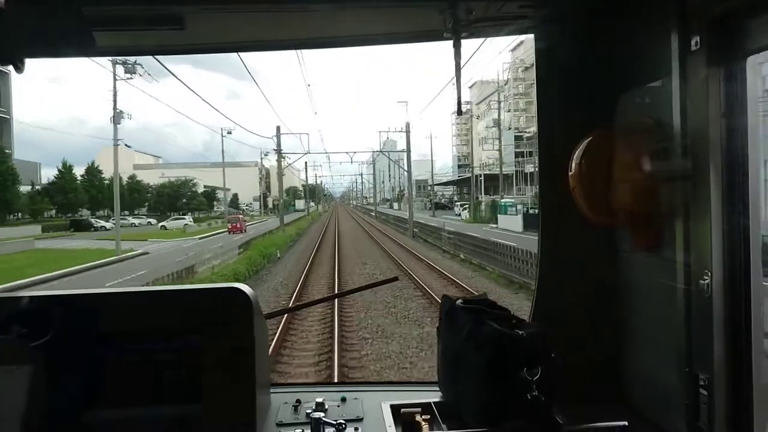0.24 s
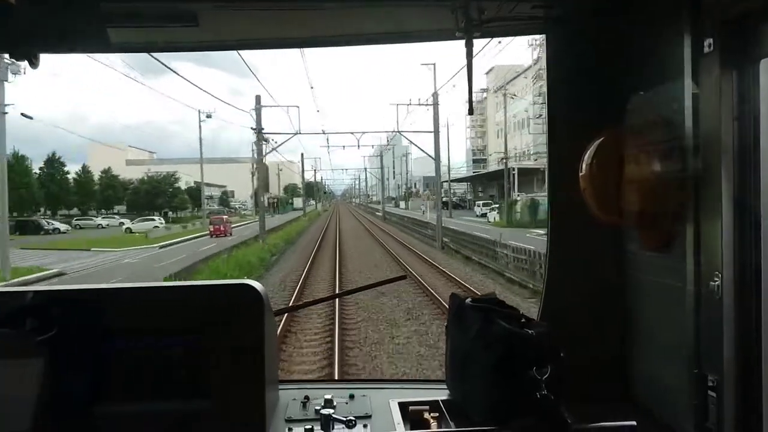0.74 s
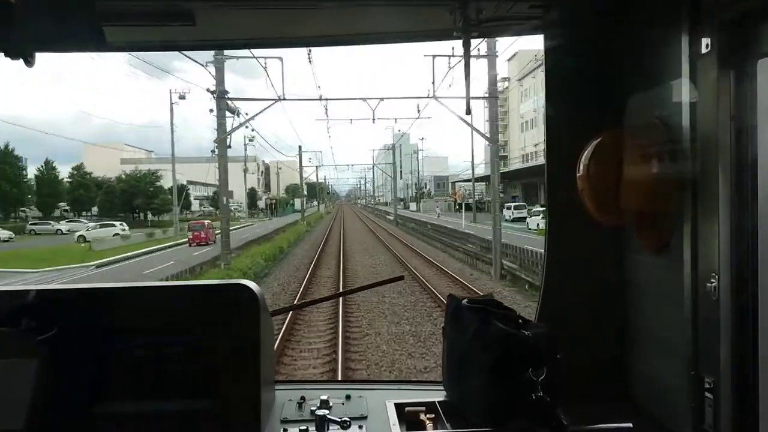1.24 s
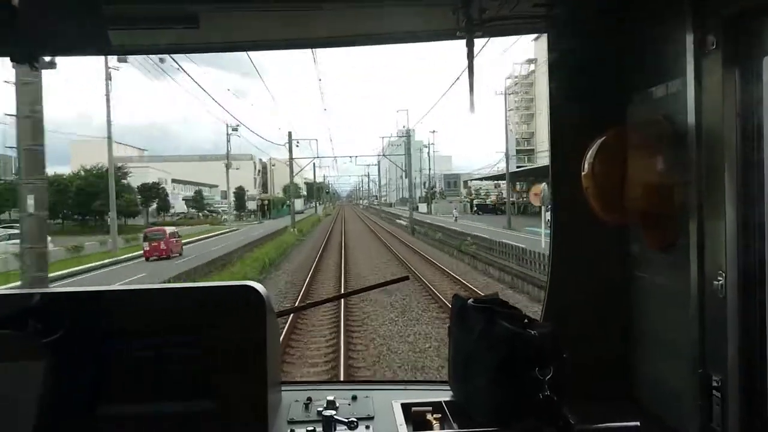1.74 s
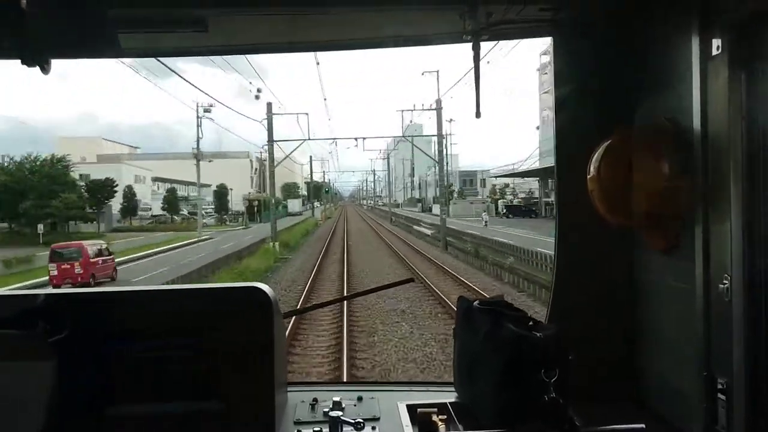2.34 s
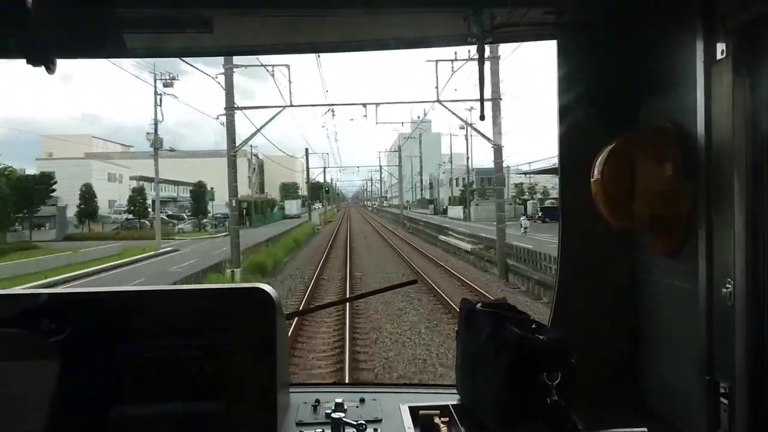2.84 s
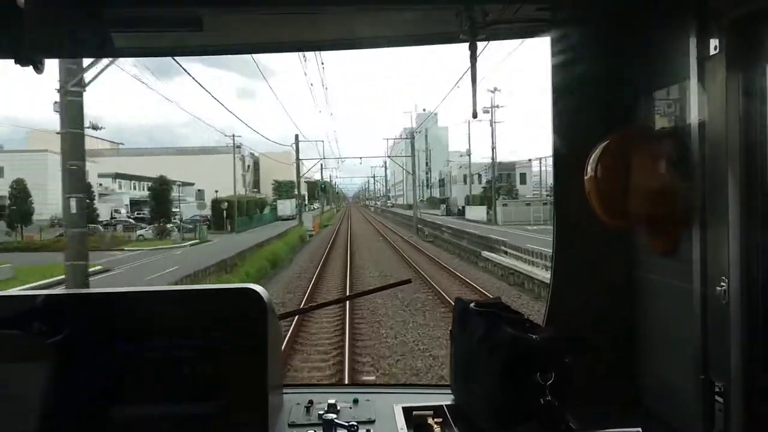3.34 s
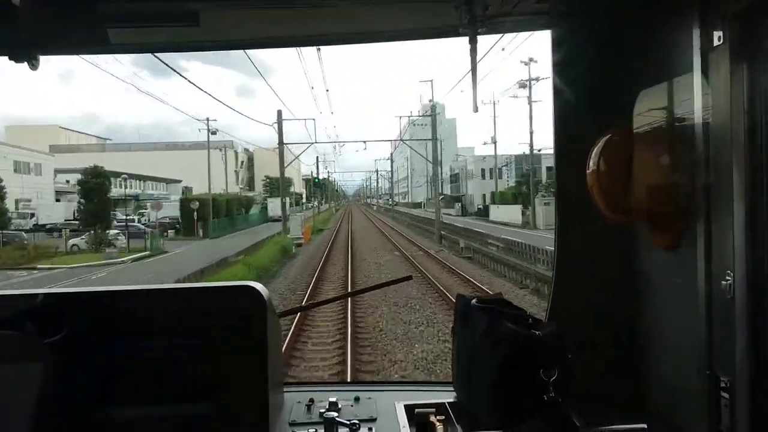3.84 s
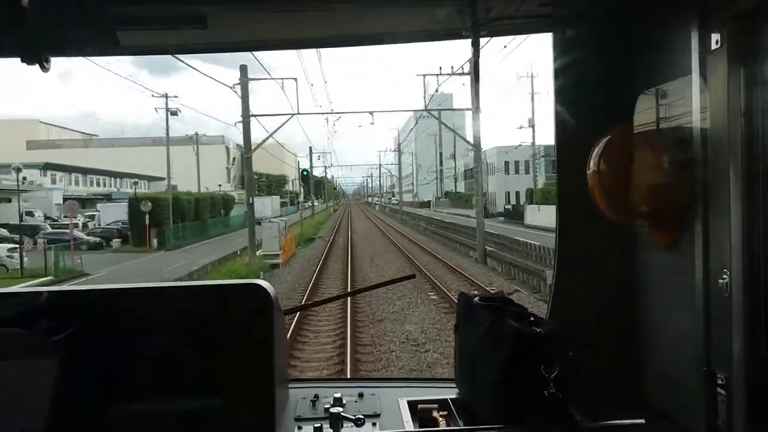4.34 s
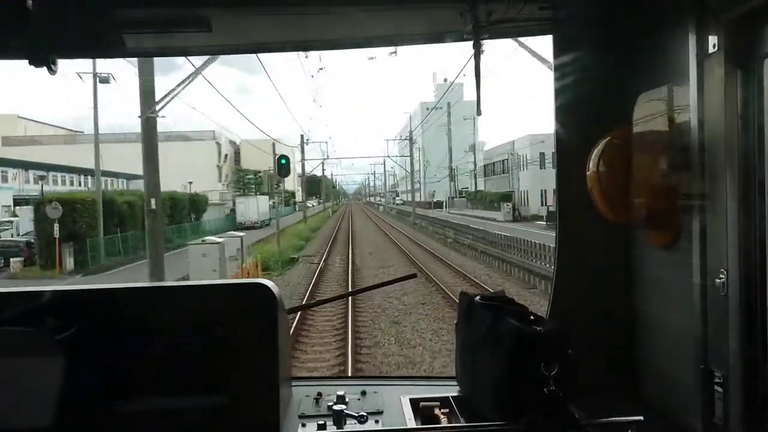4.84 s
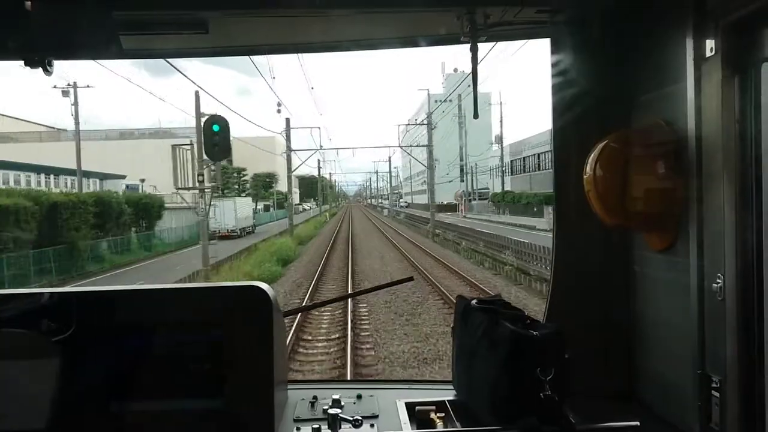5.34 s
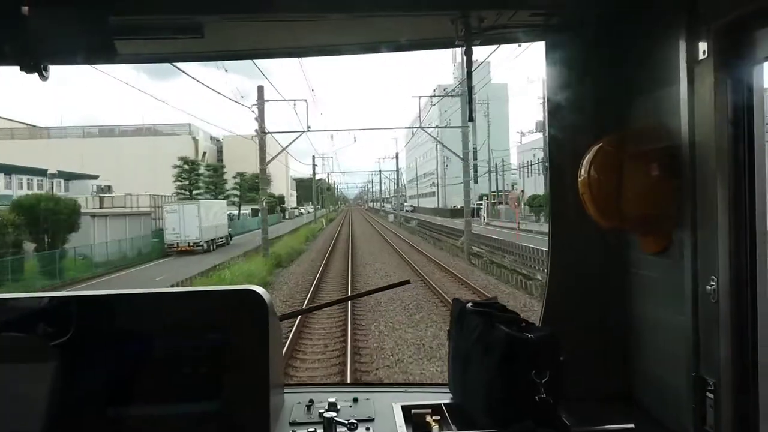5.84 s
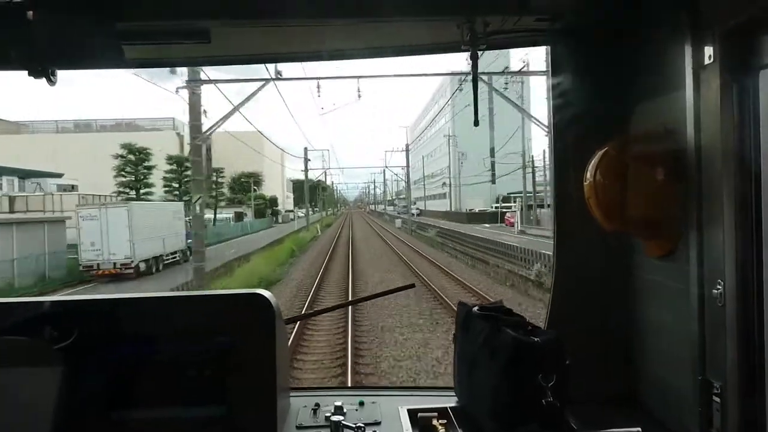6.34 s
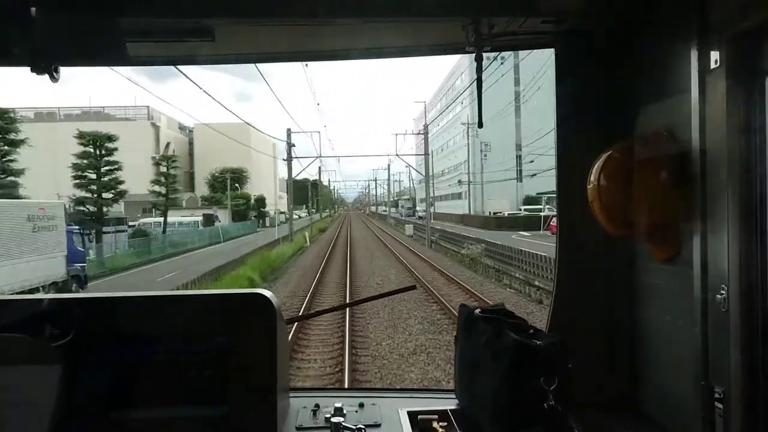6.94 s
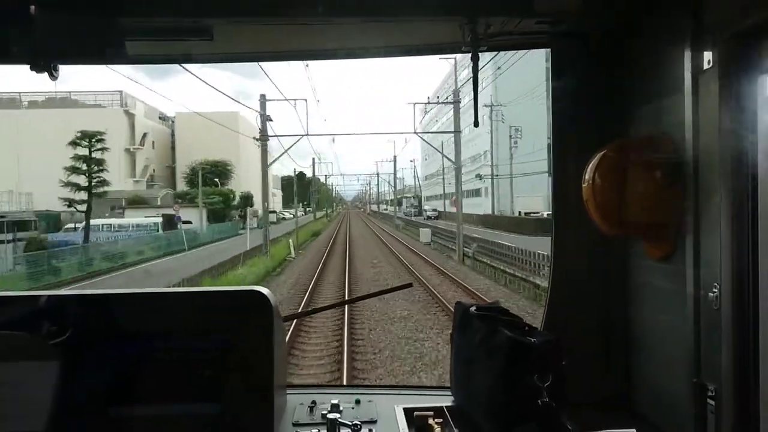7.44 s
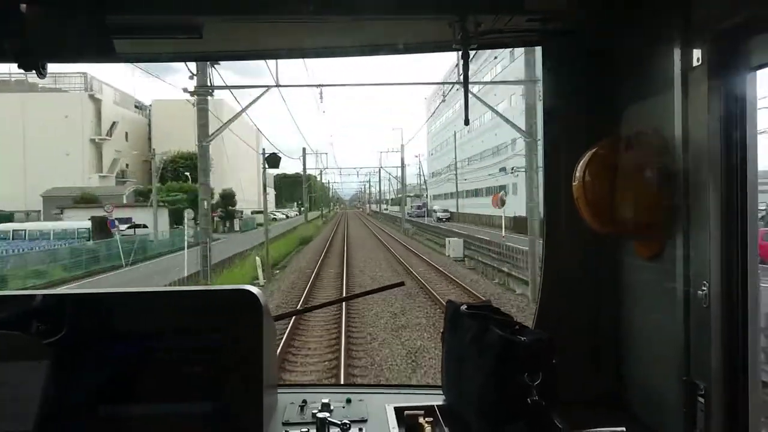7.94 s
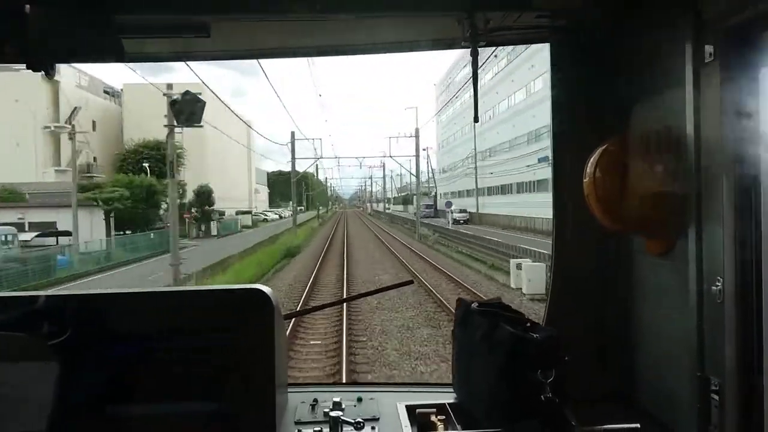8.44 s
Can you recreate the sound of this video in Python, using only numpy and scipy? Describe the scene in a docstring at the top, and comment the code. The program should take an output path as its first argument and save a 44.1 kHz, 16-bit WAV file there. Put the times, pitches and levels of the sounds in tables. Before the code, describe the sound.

A fast electric train heard from its cab, rumbling and roaring over rails, clattering across a joint, with faint whine, knocks and a brief trackside whoosh.

```python
"""A low, uneven boom and the roar of wheels fill the driver's cab of an electric train at speed.
Rough rails shake the car body and excite the wheels; roar and boom are coloured noise that follows the roughness.
The front bogie clatters over a rail joint: bursts of noise, ringing steel modes and body thumps.
Two wavering gear tones whine faintly, and noise bursts make the cab fittings rattle.
A short rush of noise comes back from the trackside, made of hollow, comb-filtered swells."""
import sys
import numpy as np
from scipy import signal
from scipy.fft import rfft, irfft
from scipy.io import wavfile
from scipy.ndimage import uniform_filter1d

SR = 44100
rng = np.random.default_rng(int(sys.argv[2]) if len(sys.argv) > 2 else 0)


def generate_wav(signal):
    """Clip the signal to [-1, 1] and save it as 16-bit WAV at the path in sys.argv[1]."""
    frames = np.transpose(np.atleast_2d(signal))
    scaled = np.clip(frames, -1, 1) * 32767
    pcm = np.round(scaled).astype(np.int16)
    wavfile.write(sys.argv[1], SR, pcm)


N = 382788
T = np.arange(N) / SR  # seconds
FREQS = np.maximum(np.arange(N // 2 + 1) * SR / N, 1)  # Hz, kept above zero


# Course of the rail roughness. Each row: time in seconds, roughness in dB (only its departure from the mean counts).
RAIL_ROUGHNESS = [(0.0, -45), (0.81, -46.5), (1.55, -43.5), (1.92, -45.5), (2.54, -42), (3.59, -45),
                  (3.93, -43), (4.12, -44), (7.07, -48.5), (7.95, -48.5), (8.29, -45), (8.6, -49)]
# Short stretches of altered rail wear. Each row: start in seconds, length in seconds, added roughness in dB.
WORN_STRETCHES = [(0.283, 0.073, 3), (1.234, 0.28, 1), (2.857, 0.074, 2), (3.688, 0.38, 4),
                  (4.507, 0.085, 1.5), (5.297, 0.34, 1), (8.266, 0.13, -0.5)]
WORN_EDGE_S = 0.066


def roughness():
    """Rail roughness in dB, the one control for boom, drumming, roar and hiss: slow course plus worn stretches."""
    course, = in_time(RAIL_ROUGHNESS)
    worn = np.zeros(N)
    for start, length, db in WORN_STRETCHES:
        inside_s = np.minimum(T - start, start + length - T)
        worn += db * np.clip(inside_s / WORN_EDGE_S + .5, 0, 1)
    return course - course.mean() + worn


# Colour of the body boom. Each row: frequency in Hz, relative density in dB per Hz.
BOOM_COLOUR = [(22, -30), (32, -13), (42, -3), (62, -4), (80, 1), (100, -3), (130, -11), (180, -15.5)]
# Colour of the drumming floor. Each row: frequency in Hz, relative density in dB per Hz.
DRUMMING_COLOUR = [(76, -44), (130, 0), (173, -3), (281, -7.5), (437, -16), (480, -22.5), (620, -48),
                   (1060, -120)]
# Car body modes. Each row: frequency in Hz, width in Hz, relative power in dB.
BODY_MODES = [(61.6, 4.5, -23), (84, 49, 18), (113, 25, -26), (250, 50, -23)]
# Floor panel modes. Each row: frequency in Hz, width in Hz, relative power in dB.
PANEL_MODES = [(132.8, 6.7, -1), (203.7, 15.4, -3), (248.7, 36, 0), (289, 12.5, -5.5), (347, 18.7, -8),
               (392, 19, -15)]
# Heaves of the body on its springs. Each row: centre in seconds, bell width in seconds, pitch in Hz, level in dB.
BODY_HEAVES = [(.01, 0.024, 60.5, -19), (.96, 0.018, 66, -19), (1.195, 0.055, 66.6, -16),
               (1.272, 0.033, 85.9, -16.5), (2.504, 0.026, 89.2, -15), (2.703, 0.033, 58.9, -19.5),
               (3.866, 0.08, 78, -19), (4.145, 0.021, 60.8, -13.5), (4.362, 0.023, 72, -14),
               (4.823, 0.046, 75.6, -21.5), (5.377, 0.036, 61, -14), (6.8, 0.095, 60.7, -20.5),
               (8.604, .06, 59.8, -22)]
# level in dB on average rail, and dB gained per dB of roughness
BOOM_DB, BOOM_FOLLOWS = -22.5, 0.55
DRUM_DB, DRUM_FOLLOWS = -29.5, 0.95
SLEEPER_HZ, SLEEPER_DB = 61.44, -29.5


def car_body(rough_db, mode_db, sway_db):
    """Roughness makes the body boom and the floor drum; sleepers add a hum, each heave rings at one pitch."""
    lowest_mode = cab_noise(resonances(BODY_MODES[:1]) ** 2)
    body = steady(coloured(BOOM_COLOUR) + from_db(mode_db) * lowest_mode, span_s=0.13)
    boom = from_db(BOOM_DB + BOOM_FOLLOWS * rough_db + sway_db * drift(2.8)) * body

    sleepers = from_db(SLEEPER_DB) * hum(SLEEPER_HZ, waver_hz=2.35)
    heaves = sum(swells([(s, width_s, db)]) * hum(hz, waver_hz=3.06) for s, width_s, hz, db in BODY_HEAVES)

    panels = cab_noise(resonances(PANEL_MODES) / (1 + (FREQS / 520) ** 6))
    floor = steady(coloured(DRUMMING_COLOUR) + panels, span_s=0.091)
    drumming = from_db(DRUM_DB + DRUM_FOLLOWS * rough_db) * floor
    return boom + sleepers + heaves + drumming


# Colour of the wheel roar. Each row: frequency in Hz, relative density in dB per Hz.
ROAR_COLOUR = [(250, -33), (420, -1.5), (523, 2), (680, -4), (789, -2.5), (1020, -5), (1130, -2.5),
               (1490, -8.5), (2380, -7.5), (3400, -19), (4420, -61), (7480, -120)]
# Colour of the rail hiss. Each row: frequency in Hz, relative density in dB per Hz.
HISS_COLOUR = [(3000, 6), (4000, 0.5), (5200, -4.5), (6400, -9.5), (7400, -23), (8700, -29.5),
               (9700, -16.5), (11500, -18), (13500, -29), (15000, -52)]
# Wheel and rail modes, for rolling and blows alike. Each row: frequency in Hz, width in Hz, relative strength in dB.
STEEL_MODES = [(555, 46, 4), (803, 55, 1.7), (1263, 70, -1.5), (1446, 45, -5.5), (1770, 164, 3.5),
               (2000, 110, -5.5), (2440, 60, -6.5), (2690, 280, 3.5), (3050, 100, -1.5), (3800, 110, -8),
               (4300, 100, -8), (5380, 95, -7.5)]
# Swells of wheel ringing. Each row: centre in seconds, bell width in seconds, band centre in Hz, relative level in dB.
WHEEL_RINGS = [(0.303, 0.075, 2650, -44), (1.29, .04, 2300, -40), (1.512, 0.063, 2230, -39),
               (3.92, 0.085, 2100, -40.5), (5.58, 0.071, 2350, -42), (6.72, 0.05, 2000, -43),
               (7.16, .025, 2200, -46), (7.997, 0.023, 2410, -48), (8.2, 0.043, 2500, -51),
               (8.306, 0.13, 2080, -40.5)]
# level in dB on average rail, and dB gained per dB of roughness
ROAR_DB, ROAR_FOLLOWS = -36, 0.61
HISS_DB, HISS_FOLLOWS = -47, 1.01


def rolling(rough_db, steel_db, ring_db, ring_width_hz, flutter_db, wander_db):
    """Wheels roar and ring and the rail hisses; a wandering, fluttering contact load moves roar and hiss."""
    load_db = flutter_db * drift(27) + wander_db * drift(3.7)
    steel = resonances(STEEL_MODES)
    contact = coloured(ROAR_COLOUR) + from_db(steel_db) * cab_noise(steel)
    roar = from_db(ROAR_DB + ROAR_FOLLOWS * rough_db + load_db) * contact

    # each rippled stretch of rail drives the modes near its own pitch hardest
    ripples = np.zeros((2, N))
    for s, width_s, hz, db in WHEEL_RINGS:
        ripples += swells([(s, width_s, db)]) * cab_noise(steel * band(hz, ring_width_hz))
    flicker = rms_one(from_db(1.8 * drift(45)))
    ringing = from_db(ring_db) * flicker * ripples

    hiss = from_db(HISS_DB + HISS_FOLLOWS * rough_db + load_db) * coloured(HISS_COLOUR)
    return roar + ringing + hiss


# Wheels striking joints and welds.
# Each row: start in seconds, relative clash level in dB, relative thump level in dB, clash decay in seconds.
JOINT_BLOWS = [(1.44, -39.5, -45, 0.11), (2.4365, -27.5, -17, 0.043), (2.485, -38, -26, 0.026),
               (2.499, -36, -19, 0.015), (2.519, -36, -22, 0.038), (2.534, -39, -22.5, 0.013),
               (2.89, -35.5, -17, 0.047), (3.79, -37.5, -18, 0.082)]
# Colour of the clash. Each row: frequency in Hz, relative density in dB per Hz.
CLASH_COLOUR = [(150, -10), (300, 1), (800, 7.5), (1500, 4), (3800, 1), (6000, -6), (8000, -69),
                (10500, -11), (14500, -28)]


def joints(clash_db, steel_db, steel_damping, thump_db, thump_decay_s):
    """Each wheel blow gives a clash of noise, a ring of steel modes and a muffled thump of the car body."""
    clash = sum(from_db(db) * blow(s, .0012, decay_s) for s, db, _, decay_s in JOINT_BLOWS)
    hits = [(s, db + steel_db) for s, db, _, _ in JOINT_BLOWS]
    ring = struck(STEEL_MODES, hits, damping=steel_damping, tilt_db=0.8, apart=1.0, rise_s=0.0036)
    metal = from_db(clash_db) * clash * coloured(CLASH_COLOUR) + ring

    thump = sum(from_db(db) * blow(s, 0.0027, thump_decay_s) for s, _, db, _ in JOINT_BLOWS)
    muffled = resonances(BODY_MODES) / (1 + (FREQS / 500) ** 2)
    return metal + from_db(thump_db) * thump * steady(cab_noise(muffled), span_s=0.15)


# Shudders of the bogie. Each row: centre in seconds, bell width in seconds, level in dB.
BOGIE_SHUDDERS = [(.5, 0.11, -23), (1.31, 0.063, -21), (1.58, 0.018, -21), (2.93, 0.019, -18),
                  (3.9, 0.22, -25), (4.48, .13, -29)]
# Jolts from the wheels that knock the floor. Each row: start in seconds, relative level in dB.
FLOOR_KNOCKS = [(.012, -20.5), (0.453, -21.5), (.62, -27.5), (0.814, -20), (0.93, -26), (1.015, -22.5),
                (1.124, -23.5), (1.226, -23.5), (1.355, -27), (1.475, -21.5), (1.565, -24), (1.664, -20),
                (2.105, -28), (2.426, -19.5), (2.514, -23.5), (2.84, -23), (2.92, -19.5), (3.776, -29),
                (3.976, -22), (4.491, -26), (4.559, -22.5), (5.245, -24.5), (5.328, -26), (5.52, -23),
                (5.587, -25), (5.769, -26.5), (7.11, -28.5), (8.05, -24.5)]


def bogie(shudder_hz, width_hz, knock_db, knock_tilt_db):
    """The bogie shudders as a band of noise above the boom; its jolts set the floor panel modes ringing."""
    shudder = swells(BOGIE_SHUDDERS) * steady(cab_noise(band(shudder_hz, width_hz)), span_s=0.099)
    knocks = struck(PANEL_MODES, FLOOR_KNOCKS, damping=1.0, tilt_db=knock_tilt_db, apart=0.31, rise_s=0.0038)
    return shudder + from_db(knock_db) * knocks


# Whine of the two gear sets. Each row: time in seconds, relative upper level in dB, relative lower level in dB.
GEAR_WHINE = [(0, -56, -50), (.35, -45, -54), (1.7, -56, -62), (4.5, -50, -49), (5.6, -63, -69),
              (7.0, -59, -57), (7.45, -50, -47), (7.73, -57, -58), (7.77, -50, -45), (8.2, -46, -43),
              (8.35, -53, -47), (8.48, -50, -44), (8.6, -41.5, -48)]
# Mesh pitches: upper gear set in Hz, lower gear set in Hz.
GEAR_PITCHES = [1141, 1097]
# Upper whine surging as its gears take load. Each row: centre in seconds, bell width in seconds, relative level in dB.
GEAR_SURGES = [(1.217, 0.021, -41), (3.46, .02, -41), (5.92, .016, -37.5), (6.44, .02, -44),
               (6.678, 0.016, -39), (8.2, .018, -44)]


def drive(level_db, waver_hz, shimmer_db, path_radians):
    """Two gear sets mesh at nearly the same rate; each wavering tone reaches the two sides by shifting paths."""
    upper, lower = from_db(in_time(GEAR_WHINE))
    surging_upper = np.hypot(upper, swells(GEAR_SURGES))
    tones = np.zeros((2, N))
    for hz, level in zip(GEAR_PITCHES, [surging_upper, lower]):
        phase = 2 * np.pi * np.cumsum(hz + waver_hz * drift(47.0)) / SR
        paths = np.array([drift(5.7), drift(3.0)])
        shimmer = from_db(shimmer_db * drift(33))
        tones += level * rms_one(shimmer * np.sin(phase + path_radians * paths))
    return from_db(level_db) * tones


# Hard jolts of loose cab fittings. Each row: start in seconds, relative level in dB.
HARD_JOLTS = [(.4434, -54.5), (.5187, -58), (.7417, -53), (.8275, -56), (.9023, -55), (1.4391, -50.5),
              (2.4379, -44), (2.4857, -48), (2.63, -53), (2.7472, -52), (2.8275, -55), (2.9637, -52),
              (3.04, -58), (3.7773, -49), (3.8342, -54), (4.31, -58), (4.4867, -51.5), (4.5785, -59),
              (4.735, -61), (5.256, -56), (5.3078, -57), (6.4467, -54), (6.5954, -55), (7.13, -60),
              (7.53, -62), (7.9977, -54.5), (8.34, -52.5)]
# Colour of the rattle. Each row: frequency in Hz, relative density in dB per Hz.
RATTLE_COLOUR = [(1000, -20), (3000, -4), (6000, 4), (8000, -7.5), (10500, -5.5), (14500, -6.5)]
# faint jolts at random in between: mean rate, relative level and spread either way
JOLTS_PER_S, JOLT_DB, JOLT_SPREAD_DB = 1.4, -63.5, 13


def fittings(level_db, decay_s):
    """Jolted fittings rattle in short bursts of bright noise with a sharp rise and exponential decay."""
    chance = rng.random((60, 2))
    times = np.cumsum(.5 + chance[:, 0]) / JOLTS_PER_S
    levels_db = JOLT_DB + JOLT_SPREAD_DB * (2 * chance[:, 1] - 1)
    faint = [(s, db) for s, db in zip(times, levels_db) if s < T[-1]]
    jolts = sum(from_db(db) * blow(s, 0.00045, decay_s) for s, db in list(HARD_JOLTS) + faint)
    return from_db(level_db) * jolts * coloured(RATTLE_COLOUR)


# Thin squeaks of a rubbing fitting. Each row: centre in seconds, bell width in seconds, level in dB.
FITTING_SQUEAKS = [(5.46, 0.052, -62), (5.78, .03, -68), (7.83, 0.031, -64)]


def squeaks(hz, width_hz):
    """A fitting rubs and sings in one high, narrow mode."""
    return swells(FITTING_SQUEAKS) * cab_noise(band(hz, width_hz))


# Trackside structures throwing the wheel noise back.
# Each row: centre in seconds, bell width in seconds, band centre in Hz, band width in Hz, level in dB.
TRACKSIDE_RUSHES = [(6.058, 0.012, 500, 420, -32), (6.077, 0.02, 1000, 1660, -36),
                    (6.146, 0.038, 720, 850, -32.5), (6.16, 0.082, 1850, 1100, -42),
                    (6.193, 0.023, 2600, 160, -45), (6.284, 0.033, 2170, 1000, -40)]


def trackside(comb_hz, bounce, grain_db):
    """Noise swells roughly as hard surfaces pass close by; bouncing across the narrow gap rings it hollow."""
    gap = 1 / abs(1 - bounce * np.exp(-2j * np.pi * FREQS / comb_hz))
    rush = np.zeros((2, N))
    for s, width_s, hz, width_hz, db in TRACKSIDE_RUSHES:
        rush += swells([(s, width_s, db)]) * cab_noise(gap * band(hz, width_hz))
    return rms_one(from_db(grain_db * drift(90))) * rush


# Likeness of the two sides in the cab. Each row: frequency in Hz, left-right correlation from -1 to 1.
SIDE_LIKENESS = [(60, .996), (125, .975), (270, .9), (450, .68), (740, .48), (1200, .08), (1900, -.22),
                 (3300, -.03), (6000, 0)]


def cab_noise(gain):
    """Diffuse noise of unit power in the cab: alike at both ears in the bass, unrelated in the high treble."""
    mid, side = rfft(rng.standard_normal((2, N)))
    alike = np.clip(over_hz(SIDE_LIKENESS), -1, 1)
    pair = np.sqrt(1 + alike) * mid + np.sqrt(1 - alike) * side * [[1], [-1]]
    return rms_one(irfft(pair * gain, N))


def coloured(spectrum):
    """Cab noise with a given colour, falling steeply beyond its ends."""
    low_skirt = 1 / (1 + (spectrum[0][0] / FREQS) ** 8)
    high_skirt = 1 / (1 + (FREQS / spectrum[-1][0]) ** 16)
    return cab_noise(from_db(over_hz(spectrum)) * low_skirt * high_skirt)


def resonances(modes):
    """Summed power response of damped modes, as a gain; each mode's power is set by its dB."""
    power = 0
    for hz, width, db in modes:
        detuning = (FREQS ** 2 - hz ** 2) / (FREQS * width)
        power = power + from_db(db) ** 2 / width / (1 + detuning ** 2)
    return np.sqrt(power)


def band(hz, width_hz):
    """Gain of one resonance applied twice, for a band with steeper sides."""
    return resonances([(hz, width_hz, 0)]) ** 2


def struck(modes, hits, damping, tilt_db, apart, rise_s):
    """Each hit rings all modes with fresh strengths and phases; tilt in dB per octave, sides apart in radians."""
    age = T[:SR // 4]
    hz, width, mode_db = np.transpose(modes)[:, :, None]
    tilted = from_db(mode_db + tilt_db * np.log2(hz / hz[0]))
    decays = tilted * np.exp(-np.pi * damping * width * age)
    rise = 1 - np.exp(-age / rise_s)
    out = np.zeros((2, N + len(age)))
    for s, db in hits:
        strength, phase, offset = rng.standard_normal((3, len(modes), 1))
        sides = np.pi * phase + apart * np.array([offset, -offset]) / 2
        partials = from_db(2 * strength) * decays * np.sin(2 * np.pi * hz * age + sides)
        ring = np.sum(partials * rise, axis=1)
        start = max(int(s * SR), 0)
        # level set by the first 30 ms
        out[:, start:start + len(age)] += from_db(db) * ring / ring[:, :int(.03 * SR)].std()
    return out[:, :N]


def hum(hz, waver_hz):
    """A low tone of unit power with a wandering pitch."""
    cycles = rng.random() + np.cumsum(hz + waver_hz * drift(8.2)) / SR
    return np.sqrt(2) * np.sin(2 * np.pi * cycles)


def blow(s, rise_s, decay_s):
    """Envelope of a blow: quick rise, exponential decay."""
    out = np.zeros(N)
    span = slice(*np.searchsorted(T, [s, s + 10 * decay_s]))
    age = T[span] - s
    out[span] = (1 - np.exp(-age / rise_s)) * np.exp(-age / decay_s)
    return out


def swells(rows):
    """Smooth bell-shaped rises in level; the width is the bell's standard deviation."""
    out = np.zeros(N)
    for s, width_s, db in rows:
        span = slice(*np.searchsorted(T, [s - 5 * width_s, s + 5 * width_s]))
        out[span] += from_db(db) * np.exp(-.5 * ((T[span] - s) / width_s) ** 2)
    return out


def drift(rate_hz):
    """Random wander of unit power, fading above the given rate."""
    return rms_one(irfft(rfft(rng.standard_normal(N)) / (1 + (FREQS / rate_hz) ** 2), N))


def steady(x, span_s):
    """Even out the slow swells of a narrow noise."""
    power = uniform_filter1d(np.mean(x ** 2, axis=0), max(int(span_s * SR), 1))
    return x / np.sqrt(power + 1e-9)


def from_db(db):
    """Decibels to gain."""
    return 10 ** (np.asarray(db) / 20)


def rms_one(x):
    """Scale to unit power."""
    return x / np.sqrt(np.mean(x ** 2) + 1e-20)


def in_time(rows):
    """Each column of a curve at every sample."""
    s, *columns = np.transpose(rows)
    return [np.interp(T, s, column) for column in columns]


def over_hz(points):
    """A table read on a log-frequency axis."""
    hz, value = np.transpose(points)
    return np.interp(np.log(FREQS), np.log(hz), value)


def scene():
    """Everything that reaches the cab."""
    rough_db = roughness()
    body = car_body(rough_db, mode_db=-8, sway_db=1.5)
    wheels = rolling(rough_db, steel_db=-10.5, ring_db=-1.0, ring_width_hz=1100, flutter_db=0.58, wander_db=0.74)
    blows = joints(clash_db=2.3, steel_db=-1.0, steel_damping=0.15, thump_db=-3.0, thump_decay_s=0.048)
    # the knocks favour the upper panel modes
    running_gear = bogie(shudder_hz=94, width_hz=51, knock_db=-2.3, knock_tilt_db=5)
    whine = drive(level_db=-1.0, waver_hz=12.46, shimmer_db=3.0, path_radians=0.82)
    cab = fittings(level_db=6.0, decay_s=0.053) + squeaks(hz=9340, width_hz=310)
    rush = trackside(comb_hz=497, bounce=.3, grain_db=0.5)
    return body + wheels + blows + running_gear + whine + cab + rush


# Lean of the sound between the sides. Each row: frequency in Hz, left minus right level in dB.
SIDE_LEAN = [(60, .25), (170, .1), (230, 1.1), (320, 0), (440, 1.8), (560, 0), (740, -2.3), (900, 1.3),
             (1100, -.5), (2900, 1.2), (4200, -1), (6000, -6), (7400, -6), (8400, 0), (9200, 10),
             (10200, 5.5), (12000, 1.5)]
CUTOFF_HZ = 14600


def record(dry):
    """The two microphone ports colour the sound differently; a steep elliptic low-pass cuts the top."""
    ports = from_db(over_hz(SIDE_LEAN) * [[.5], [-.5]])
    ports = ports / np.sqrt(np.mean(ports ** 2, axis=0))  # equal total power at every frequency
    heard = irfft(rfft(dry) * ports, N)
    top_cut = signal.ellip(10, .2, 80, CUTOFF_HZ, fs=SR, output="sos")
    return signal.sosfilt(top_cut, heard)


dry = scene()
out = record(dry)
generate_wav(out)
```